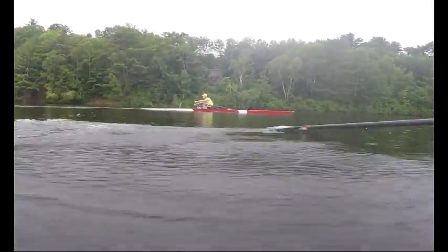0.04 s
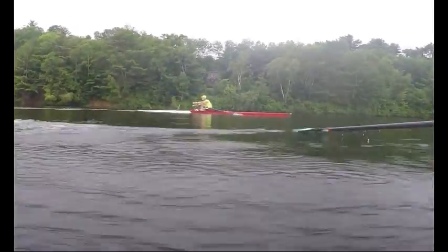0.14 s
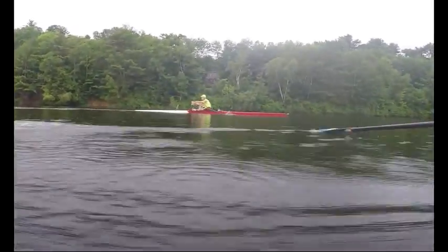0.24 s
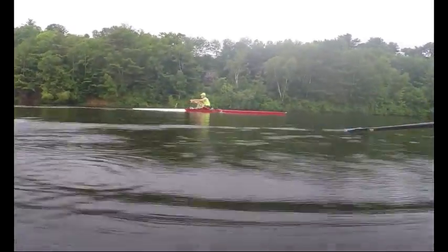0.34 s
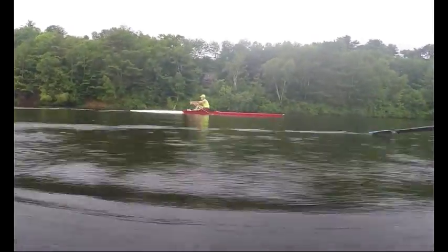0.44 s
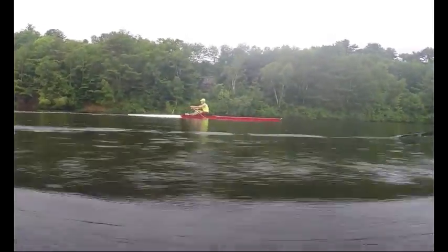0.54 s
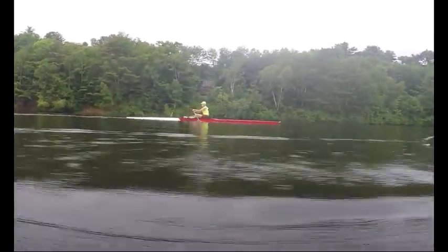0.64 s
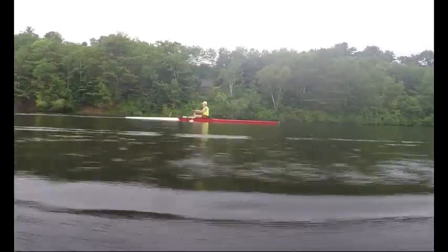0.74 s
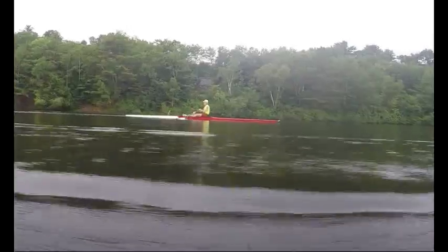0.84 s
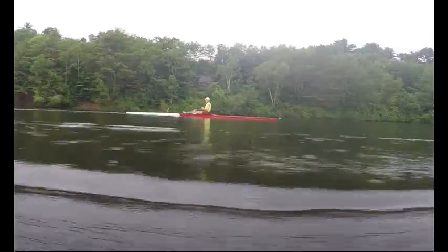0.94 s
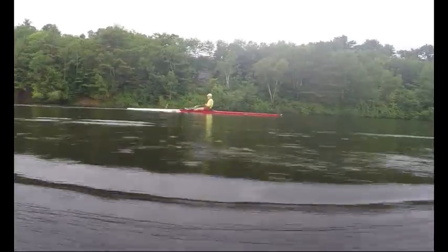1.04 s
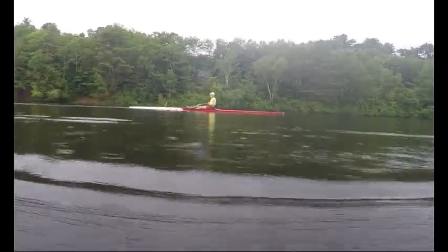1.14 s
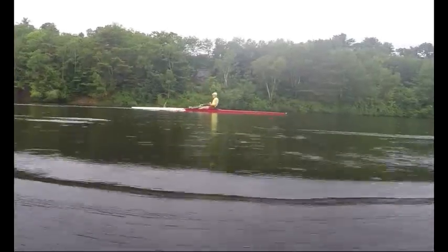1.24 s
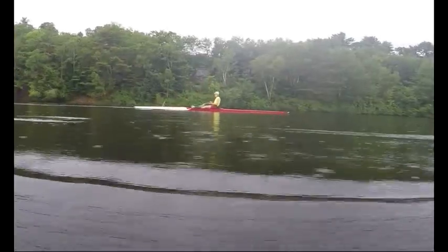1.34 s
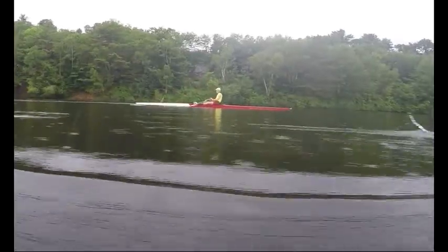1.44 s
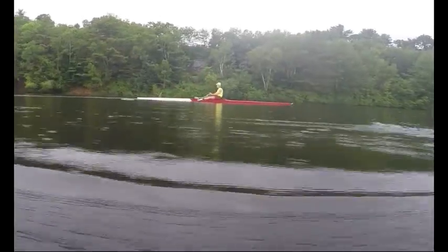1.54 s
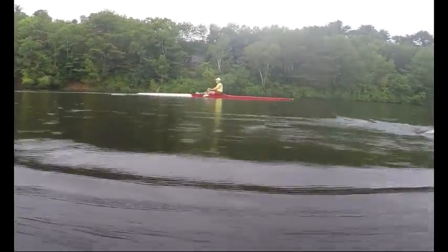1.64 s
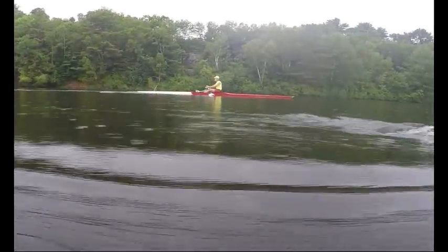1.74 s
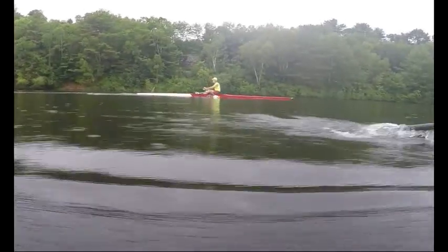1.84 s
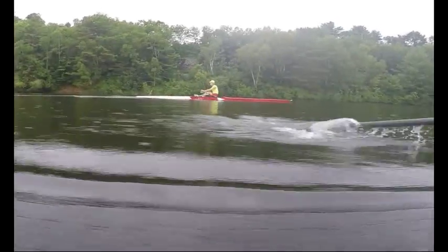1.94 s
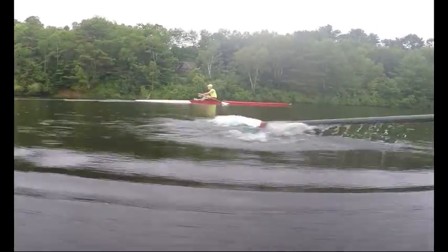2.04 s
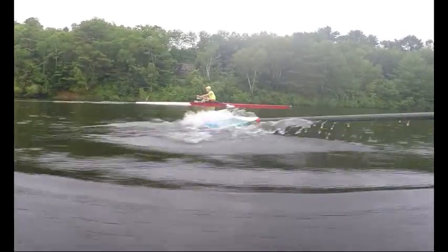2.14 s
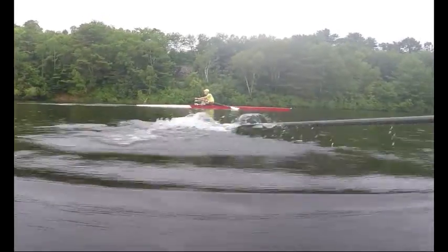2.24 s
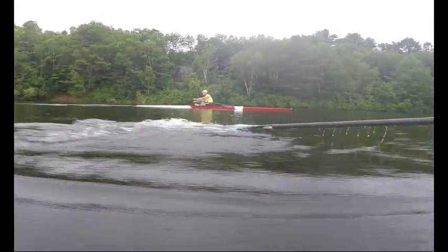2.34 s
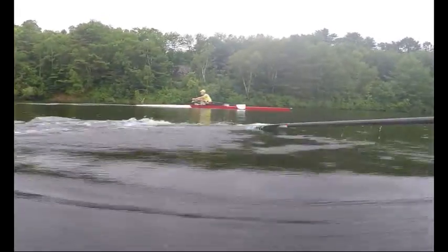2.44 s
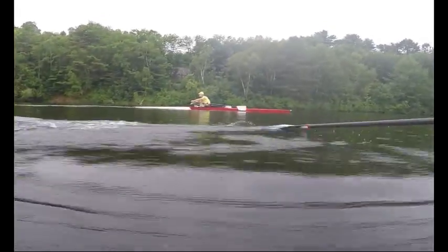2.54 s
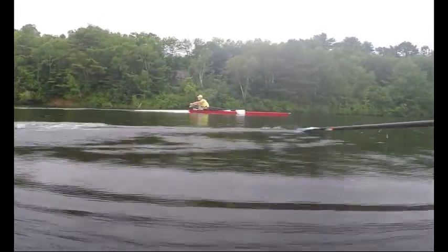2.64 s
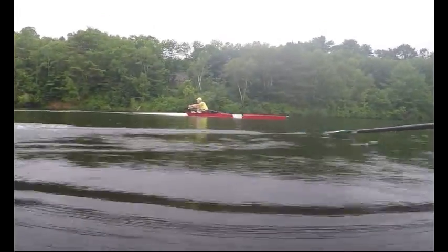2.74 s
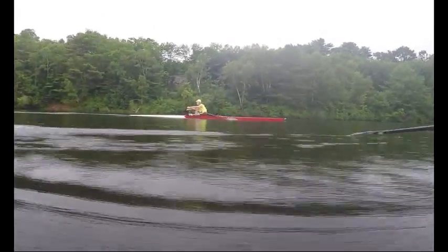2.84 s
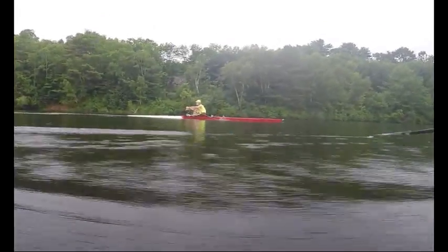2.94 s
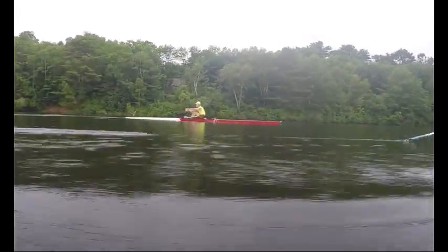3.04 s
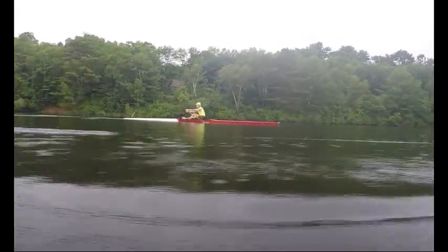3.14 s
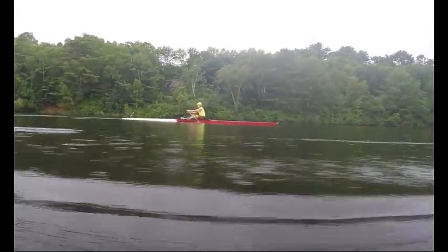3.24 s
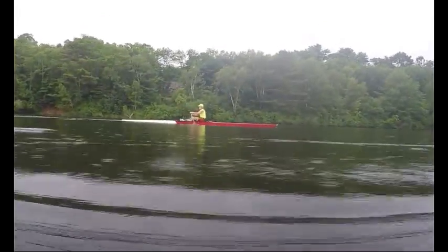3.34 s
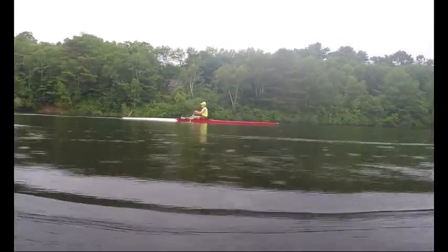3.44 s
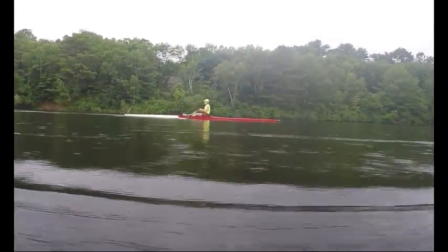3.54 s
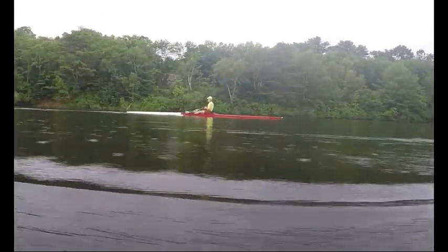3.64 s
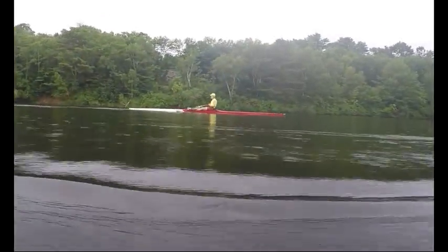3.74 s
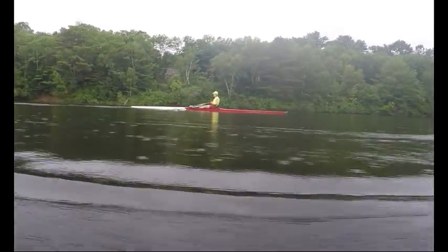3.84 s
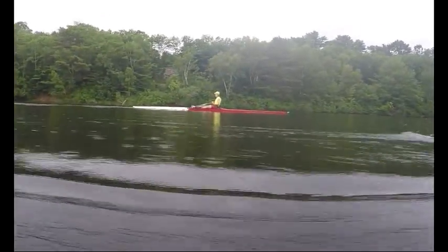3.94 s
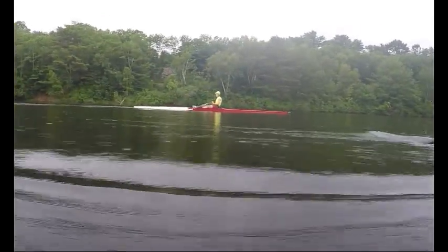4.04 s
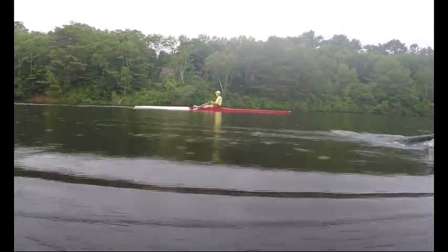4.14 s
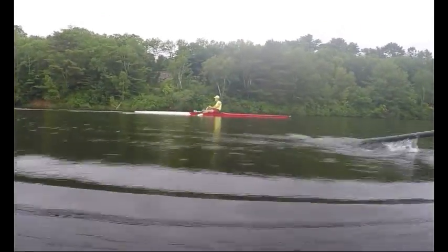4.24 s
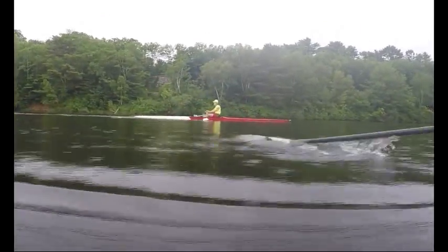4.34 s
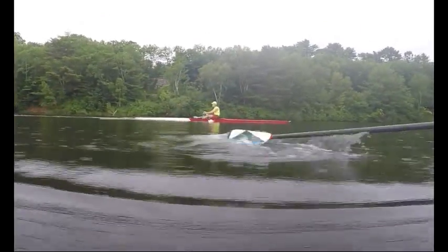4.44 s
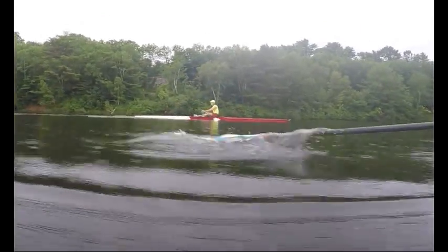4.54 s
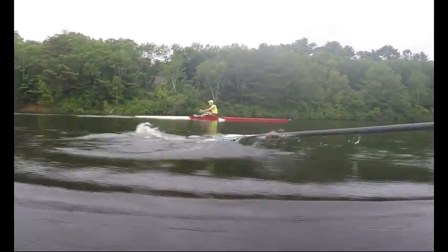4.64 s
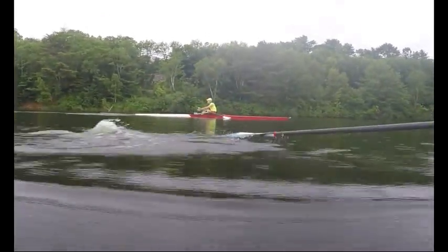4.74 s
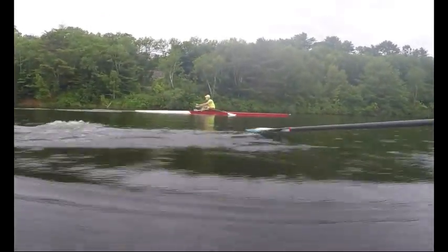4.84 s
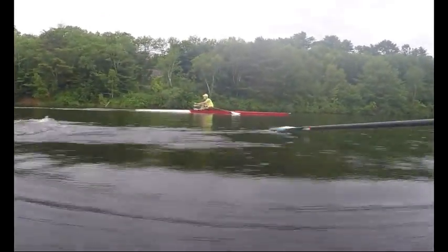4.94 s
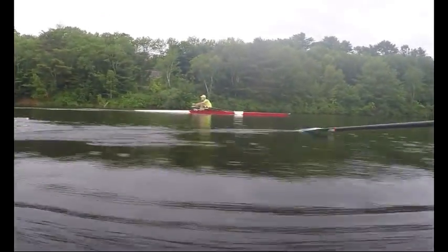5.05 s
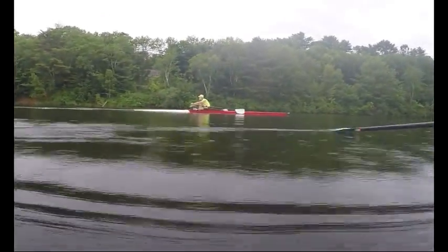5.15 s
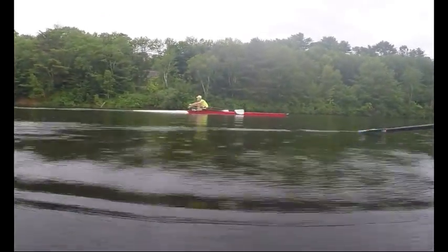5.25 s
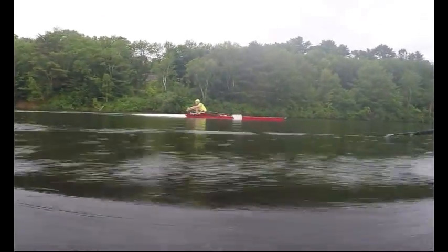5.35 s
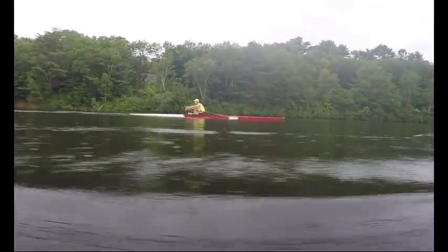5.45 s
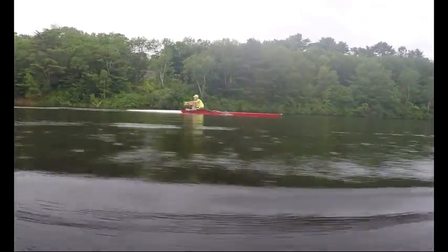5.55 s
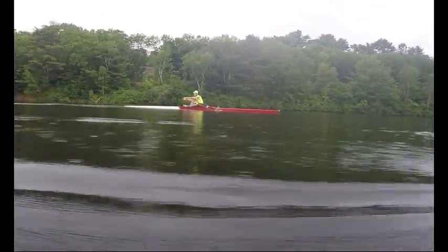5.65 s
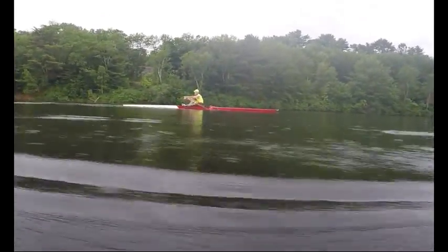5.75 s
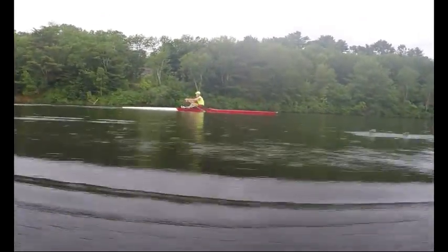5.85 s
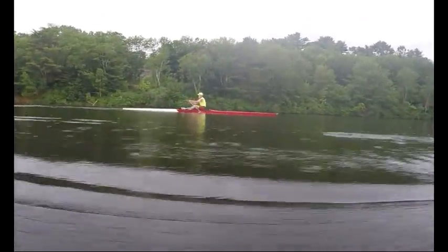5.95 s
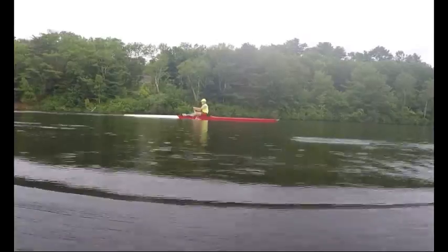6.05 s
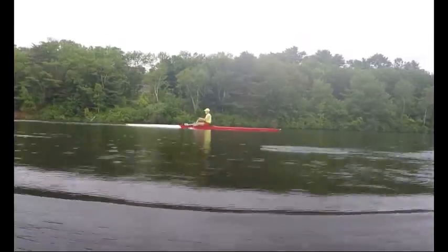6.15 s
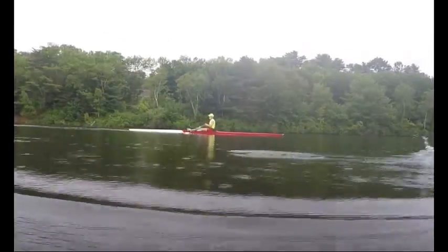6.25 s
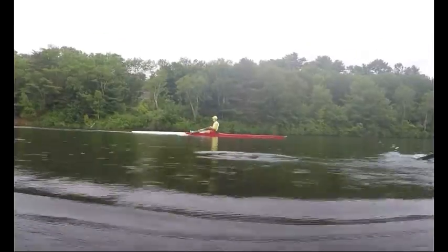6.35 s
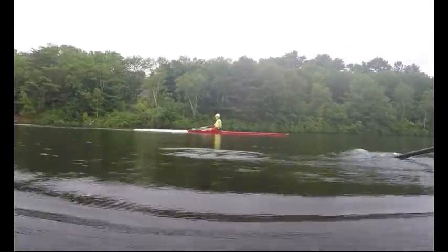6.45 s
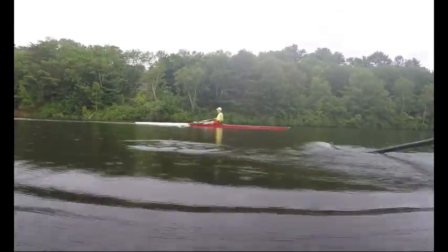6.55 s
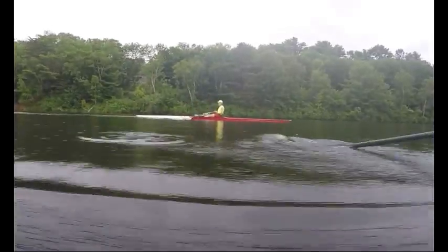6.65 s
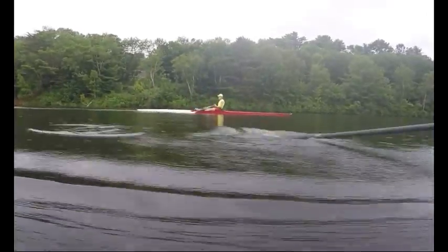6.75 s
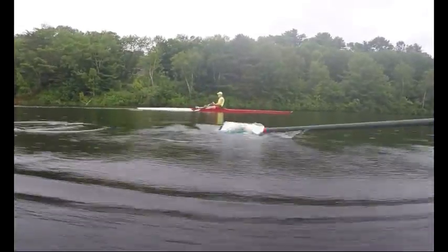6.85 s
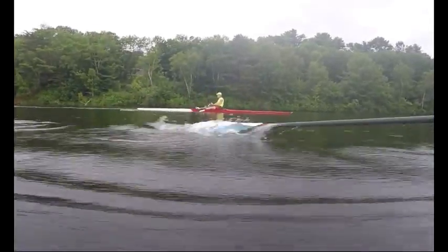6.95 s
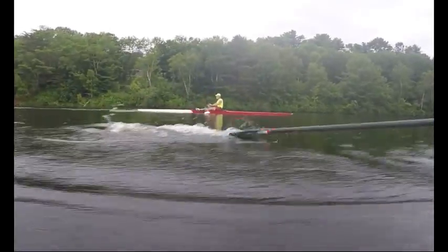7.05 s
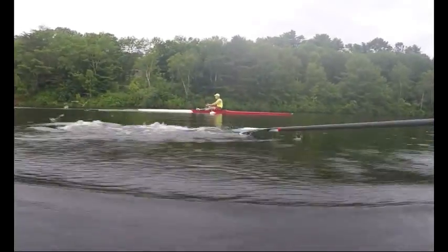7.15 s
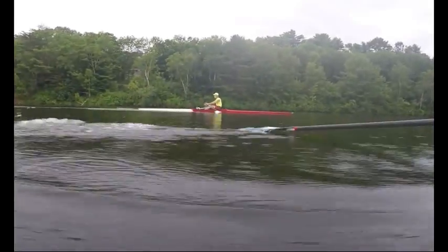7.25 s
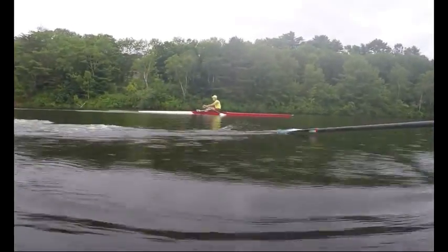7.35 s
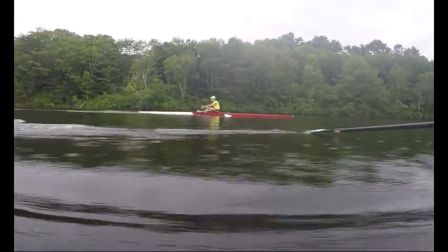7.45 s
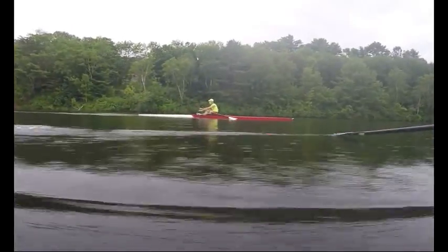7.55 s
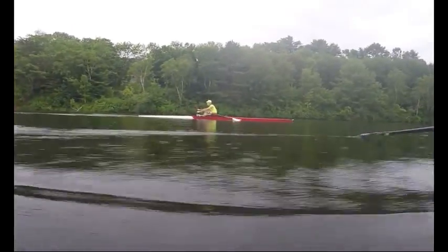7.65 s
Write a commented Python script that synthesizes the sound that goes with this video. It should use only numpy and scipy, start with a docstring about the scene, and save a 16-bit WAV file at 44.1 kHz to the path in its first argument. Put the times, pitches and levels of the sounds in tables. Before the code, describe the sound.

Slow, regular rowing heard from the boat itself: clusters of clunks and low hollow thuds about every one to one and a half seconds, alternating catch and finish. Water swells along the hull before each catch and after each finish, with gurgles and light spray. The seat softly whirrs, droplets tick sharply on the microphone's case, and deep buffeting surges after the knocks. Outdoors, dry and very close.

```python
"""Oars knock hard in their locks at each catch and finish, and the hollow hull booms under them.
Between knocks the seat rolls on its rails, water rushes past, blades splash, drops hit the case, wind shakes it.
Place: a racing rowing boat on a lake. Microphone: one, in a cased camera fixed to the boat, close to it all.
Knocks and drops are struck resonances and short noise bursts; water, wind and seat are coloured noise in swells;
bubbles and short pitched rings are sines that climb in pitch.
"""
import sys
import numpy as np
from scipy import signal
from scipy.fft import rfft, irfft, next_fast_len
from scipy.io import wavfile
from scipy.ndimage import uniform_filter1d, map_coordinates

SR = 44100
rng = np.random.default_rng(int(sys.argv[2]) if len(sys.argv) > 2 else 0)


def store_wav(level_fs):
    """Save 16-bit WAV to argv[1]."""
    pcm = np.round(np.clip(np.atleast_2d(level_fs), -1, 1) * 32767)
    wavfile.write(sys.argv[1], SR, pcm.T.astype(np.int16))


N = 339129  # length in samples


def amp(db):
    """Decibels to gain."""
    return 10 ** (np.asarray(db) / 20)


def unit(x):
    """Scale to rms 1."""
    return x / np.sqrt(np.mean(x ** 2) + 1e-20)


def blow(x, size=1100):
    """Scale a struck sound so that its first size samples have rms 1."""
    return x / np.sqrt(np.mean(x[:size] ** 2) + 1e-20)


def noise():
    """White noise as long as the scene."""
    return rng.standard_normal(N)


def curves(rows):
    """One value per sample for each column after the time."""
    s, *cols = np.transpose(rows)
    return [np.interp(np.arange(N) / SR, s, c) for c in cols]


def wobble(rate):
    """A smooth random curve, rate knots a second."""
    knots = rng.standard_normal(int(N * rate / SR) + 4)
    return map_coordinates(knots, [np.arange(N) * rate / SR])


def sine(pitch_hz):
    """A sine that follows a pitch given for every sample."""
    return np.sin(2 * np.pi * np.cumsum(pitch_hz, axis=-1) / SR)


def filtered(x, response):
    """x times a complex response of frequency."""
    m = next_fast_len(len(x) + SR // 4)
    return irfft(rfft(x, m) * response(np.fft.rfftfreq(m, 1 / SR)), m)[:len(x)]


def coloured(x, points, size=8192):
    """x through a causal minimum-phase filter with the given (Hz, dB) outline."""
    hz, db = np.transpose(points)
    gain = amp(np.interp(np.log(np.fft.rfftfreq(size, 1 / SR) + 1), np.log(hz), db))
    # folding the cepstrum makes the filter respond at once, with no pre-echo
    cepstrum = irfft(np.log(gain))
    cepstrum[1:size // 2] *= 2
    cepstrum[size // 2 + 1:] = 0
    return signal.fftconvolve(x, irfft(np.exp(rfft(cepstrum))))[:len(x)]


def resonate(x, modes):
    """x through a bank of (Hz, width Hz, dB) resonances of alternating sign."""
    def response(f):
        """Sum of the band-pass responses."""
        total = 0
        for k, (centre, width, db) in enumerate(modes):
            band = 1j * f * width / (centre * centre - f * f + 1j * f * width)
            total = total + (-1) ** k * amp(db) * band
        return total

    return filtered(x, response)


def add(track, s, x):
    """Mix x into the track at time s."""
    part = track[max(round(s * SR), 0):][:len(x)]
    part += x[:len(part)]


def patter(rate, spread_db):
    """Random tiny impacts, about rate a second, a few much stronger than the rest."""
    hit = rng.random(N) < rate / SR
    strength = np.minimum(rng.exponential(size=N), 4)
    return unit(hit * rng.choice([-1, 1], N) * amp(spread_db * strength))


def swell(times, db, delay, attack, hold, release):
    """A gain at its top delay s after each time: climbs 20 dB in attack s, holds, falls 20 dB in release s."""
    t = np.arange(N) / SR - (times + delay)[:, None]
    fall = np.maximum(np.maximum(-t / attack, (t - hold) / release), 0)
    return amp(np.max(np.reshape(db, (-1, 1)) - 20 * fall, axis=0))


def together(*gains):
    """Unrelated causes add in power."""
    return np.sqrt(sum(g ** 2 for g in gains))


# the strokes, which also time the hull and the water; levels are relative:
# catch_s, finish_s, glide_db (before the catch), effort_db (of the drive), puddle_db (left by the blades),
# spray_db (thrown), jolt_db (at the finish)
STROKES = [(-1.55, -0.5, 0, 0, 1, 0, -2), (0.83, 1.93, 2, 1, -6, 2, 0.5),
           (3.33, 4.365, -0.5, -2.5, -0.5, 0, 3.5), (5.72, 6.75, 0, 0.5, 1, -2, 2),
           (8.1, 9.15, 0, 0, 0, 0, 0)]
# the breeze on the case: time_s, relative_level_db
BREEZE = [(0.0, -18), (0.3, -25), (0.7, -19.5), (1.3, -15.5), (1.8, -19), (2.6, -20), (2.85, -26.5),
          (3.2, -20.5), (3.8, -22), (4.3, -26), (5.4, -23.5), (6.25, -17.5), (6.5, -22.5), (7.69, -22)]
# colour of the sway: frequency_hz, level_db (per Hz)
SWAY_COLOUR = [(15, -5), (27, -4.5), (36, 3.5), (43, 9.5), (52, 0.5), (75, -5.5), (110, -13), (300, -78.5)]


def wind():
    """The breeze and the jolt of each catch and finish sway the case on its mount: a low buffeting."""
    catch, finish, *_, jolt_db = np.transpose(STROKES)
    breeze_db, = curves(BREEZE)
    catch_jolt = swell(catch, db=-14.8, delay=0.01, attack=0.14, hold=0.2, release=0.3)
    finish_jolt = swell(finish, db=jolt_db - 16.8, delay=0.01, attack=0.04, hold=0.52, release=0.53)
    sway = coloured(noise(), SWAY_COLOUR)
    # the sway keeps a fairly even strength within each gust
    power = np.abs(uniform_filter1d(sway ** 2, size=4400)) + 1e-20
    sway = unit(sway / power ** 0.29)
    return amp(-2.3) * together(amp(breeze_db), catch_jolt, finish_jolt) * sway


# colour of the hull's drumming: frequency_hz, level_db (per Hz)
DRUM_COLOUR = [(60, -26.5), (90, -1.5), (118, -1.5), (138, 3.5), (162, -3.5), (195, 1), (228, -6),
               (255, -6.5), (290, -21), (390, -26), (460, -33.5), (900, -79.5)]


def hull():
    """The hull drums as the rower turns round at the catch, under the drive, and after the finish."""
    catch, finish, _, effort_db, *_ = np.transpose(STROKES)
    turn = swell(catch, db=-19.5, delay=0.06, attack=0.58, hold=0.1, release=0.26)
    drive = swell(catch, db=0.7 * effort_db - 28.5, delay=0.34, attack=0.48, hold=0.12, release=0.6)
    recoil = swell(finish, db=-17.5, delay=0.04, attack=0.04, hold=0.25, release=0.4)
    drum = unit(coloured(patter(rate=500, spread_db=1.0), DRUM_COLOUR))
    return together(amp(-30.3), turn, drive, recoil) * amp(1.4 * wobble(12)) * drum


# each run of the seat, forward before a catch and back during the drive:
# full_speed_s, hold_s, relative_level_db, whirr_hz (of the wheels at full speed)
SLIDES = [(0.58, 0.22, -35, 740), (1.17, 0.29, -35.5, 730), (3.0, 0.22, -34.5, 700),
          (3.65, 0.32, -37.5, 720), (5.46, 0.24, -35.5, 725), (6.04, 0.31, -36.5, 750),
          (7.75, 0.2, -37, 740)]
# colour of the rumble: frequency_hz, level_db (per Hz)
SEAT_COLOUR = [(280, -5.5), (450, -6.5), (580, 1.5), (690, 6.5), (780, 4.5), (880, -9.5), (1100, -12.5),
               (1600, -61.5)]


def seat(whirr_db=-9, width_hz=70, sag_hz=110):
    """The seat wheels rumble along their rails, with a whirr whose pitch climbs as they gather speed."""
    when, hold, db, hz = np.transpose(SLIDES)
    run = swell(when, db=db, delay=0.005, attack=0.55, hold=hold[:, None], release=0.27)
    top_db, top_hz = curves(np.transpose([when, db, hz]))
    pitch = top_hz - sag_hz * (1 - run / amp(top_db))
    turn = 2 * np.pi * np.cumsum(pitch) / SR
    # random strengths on sine and cosine make a narrow band of noise around the pitch
    whirr = unit(wobble(width_hz) * np.sin(turn) + wobble(width_hz) * np.cos(turn))
    rumble = unit(coloured(noise(), SEAT_COLOUR))
    rolling = together(amp(-49), run) * rumble + amp(whirr_db) * run * whirr
    return amp(1.2 * wobble(18) - 0.8) * rolling


def climbing_ring(hz, t60, rise, t):
    """A short decaying sine whose pitch climbs, as an air bubble's does when it nears the surface."""
    pitch = hz * (1 + rise * np.minimum(t / t60, 1))
    return sine(pitch) * amp(-60 * t / t60) * (1 - np.exp(-t / 0.00087))


def babble(count, low_hz, high_hz, t60, spread_db):
    """Many small bubbles of mixed size at random moments, rms 1."""
    when, pitch, life, size = rng.random((count, 4)).T[..., None]
    t = np.arange(SR // 40) / SR
    hz = low_hz * (high_hz / low_hz) ** pitch
    bubbles = amp(spread_db * size ** 2) * climbing_ring(hz, t60 * (.5 + life), 0.039, t)
    place = (when * N).astype(int) + np.arange(len(t))
    return unit(np.bincount(place.ravel(), bubbles.ravel(), N)[:N])


# colour of the droplets, in the spray and on the case: frequency_hz, level_db (per Hz)
DROPLET_COLOUR = [(1500, -6), (2100, 3), (3300, -4), (3900, -1.5), (4200, -4), (4550, 0.5), (5150, -7),
                  (5850, -2.5), (6700, -13), (8000, -19), (9500, -19), (12500, -26)]


def drizzle(rate, life_s=.002):
    """Tiny droplets: soft splats of a few milliseconds, among bubbles too brief to have a clear pitch."""
    decay = np.exp(-np.arange(SR // 50) / SR / life_s)
    power = signal.fftconvolve(patter(rate=rate, spread_db=3.5) ** 2, decay)[:N]
    splats = unit(np.sqrt(np.abs(power)) * noise())
    pings = babble(count=900, low_hz=3300, high_hz=6500, t60=.005, spread_db=13)
    return unit(coloured(splats + 0.4 * pings, DROPLET_COLOUR))


# colour of the water along the hull: frequency_hz, level_db (per Hz)
WASH_COLOUR = [(500, -1.5), (950, 1), (1150, -3.5), (1420, 0), (1800, -4.5), (2100, -0.5), (2300, -4.5),
               (2520, 0.5), (2720, -13), (2900, -6.5), (3200, -43.5), (5000, -35.5), (8000, -54),
               (12000, -68.5)]
# colour of the spray off the blades: frequency_hz, level_db (per Hz)
SPRAY_COLOUR = [(1500, -13.5), (3000, 5), (3400, 0.5), (3900, 1), (4500, 1.5), (5150, -5), (5800, -3),
                (6700, -11.5), (7400, -11), (7900, -12.5), (8800, -19.5), (12500, -21.5)]


def water():
    """Ripples bubble along the hull in glide and drive; the blades throw a fizzing spray as they leave."""
    catch, finish, glide_db, effort_db, puddle_db, spray_db, _ = np.transpose(STROKES)
    glide = swell(catch, db=glide_db - 42.2, delay=-0.28, attack=1.18, hold=0.25, release=0.34)
    drive = swell(catch, db=effort_db - 47.2, delay=0.32, attack=0.2, hold=0.3, release=0.5)
    puddle = swell(finish, db=puddle_db - 42.8, delay=0.05, attack=0.08, hold=0.24, release=0.9)
    thrown = swell(finish, db=spray_db - 55, delay=0.2, attack=0.55, hold=0.15, release=0.55)
    flow = together(amp(-50), glide, drive, puddle)

    bubbles = babble(count=4500, low_hz=958, high_hz=2702, t60=0.017, spread_db=6)
    trickle = unit(amp(4 * wobble(22)) * patter(rate=450, spread_db=3))
    wash = unit(coloured(noise() + .55 * trickle + .3 * bubbles, WASH_COLOUR))
    # longer-ringing bubbles come in uneven bunches
    lingering = babble(count=700, low_hz=900, high_hz=2500, t60=0.025, spread_db=9)
    bunches = unit(coloured(amp(4 * wobble(14)) * lingering, WASH_COLOUR))
    hull_wash = flow * (amp(1.3 * wobble(19) - 0.7) * wash + amp(-9) * bunches)

    spray = unit(coloured(noise() + .45 * patter(rate=900, spread_db=3), SPRAY_COLOUR))
    spray_gain = together(amp(-65.5), amp(-22) * flow, amp(-1.3) * thrown)
    blade_spray = spray_gain * amp(1.5 * wobble(30)) * spray
    # tiny droplets tick all through the stroke and swell with the flow and the thrown spray
    droplet_gain = together(amp(-65.5), amp(-22.5) * flow, amp(-5) * thrown)
    return hull_wash + blade_spray + droplet_gain * drizzle(rate=120)


# colour of the electronics' hiss: frequency_hz, level_db (per Hz)
HISS_COLOUR = [(2000, 4), (6000, -16), (8500, -4), (12500, -6)]


def camera(hiss_db=-72, whine_hz=6315, whine_db=-75):
    """The electronics hiss and whine very faintly; the whine's phase wanders."""
    whine = np.sin(2 * np.pi * whine_hz * np.arange(N) / SR + 1.4 * wobble(34))
    return amp(hiss_db) * unit(coloured(noise(), HISS_COLOUR)) + amp(whine_db) * whine


def chatter(t, t60, first, rise):
    """The parts seat against each other over a few milliseconds, then rattle ever more faintly."""
    hits = rng.standard_normal(len(t)) * (rng.random(len(t)) < 2500 / SR)
    rattle = hits * amp(-60 * t / t60) * (1 - np.exp(-t / rise))
    force = rattle / np.linalg.norm(rattle)
    force[round(rise * SR)] += first
    return force


# hull modes: nominal_hz, relative_level_db, t60_s
HULL_MODES = [(110.8, -11, 0.9), (138.4, -3, 0.78), (169.5, -5, 0.39), (196, 1, 0.68), (219.2, -5, 0.44),
              (248.5, -3, 0.2), (288.5, -10, .14), (389.6, -12.5, 0.16)]


def hull_boom(t, tilt_db):
    """The hull modes ring at new strengths for every blow and take a few milliseconds to build."""
    boom = np.zeros(len(t))
    for hz, level_db, t60 in HULL_MODES:
        mode_hz = hz * (1 + rng.normal(0, 0.011))
        swing = rng.choice([-1, 1]) * np.sin(2 * np.pi * mode_hz * t)
        tilt = tilt_db * np.log2(hz / HULL_MODES[0][0])
        boom += amp(level_db + tilt + rng.normal(0, 2.5) - 60 * t / t60) * swing
    return boom * (1 - np.exp(-t / 0.0036))


# oar against oarlock, seat against its stop, bunched at each catch and finish; levels are relative:
# start_s, clunk_db, thud_over_clunk_db (hull), clack_over_clunk_db, thud_tilt_db (per octave)
KNOCKS = [(0.177, -35.5, 1, -5, 0), (0.812, -29, 20, -10, -5), (0.835, -26.5, 11, -13, -5),
          (0.886, -25.5, 10, -0.5, -2), (0.916, -22, 13, -5.5, 0), (1.141, -31, -5, -18, 0),
          (1.33, -42, 26, -8, -9), (1.751, -34, 9, 0, 3), (1.79, -33.5, 3, -4, 3), (1.917, -33, 0, -8, 0),
          (1.927, -20.5, 12, -16, 2), (1.942, -23, 18, -6, 3), (1.963, -24, 19.5, -1, 4.5),
          (2.03, -32, 14, -2, 3), (2.088, -26, 6, -2, 0), (2.107, -22, 6, -7.5, 0), (2.2, -43, 25, -4, 3),
          (2.616, -31.5, 4, -6, 0), (3.012, -33.5, 8, 3, 0), (3.225, -33, 8, -9, 0), (3.313, -30, 5, -2, 0),
          (3.345, -25.5, 13, -8, 0), (3.43, -44, 27, -8, -6), (4.022, -44, 23, -6, 8),
          (4.17, -39, 3, -9, 0), (4.339, -32, 0, -6, 0), (4.369, -20.5, 17, -10, 2),
          (4.413, -24.5, 13, -4, -3), (4.487, -24, 18, -14, -10), (4.537, -26, 2, -9, 0),
          (4.557, -31, 2, -2, 0), (4.578, -22, 12, -10, 2), (4.94, -44, 22, -8, -5),
          (4.997, -31, -6, -5, 0), (5.694, -29, 15, -1, 3), (5.714, -26, 13.5, -16, 5),
          (5.76, -21.5, 14, -6, 2), (6.268, -24.5, -2, -10, 0), (6.455, -36, 5, -12, 0),
          (6.743, -18.5, 0, -14, 0), (6.767, -13, 8, -10, 2), (6.788, -19.5, 10, -17, 0),
          (6.872, -19, 10, -12, -1), (6.881, -24, 13, -1, 0), (7.032, -27.5, 10, -11, -2),
          (7.21, -44, 22, -3, 0), (7.393, -33, 0, -1, 0)]
# rigger and case resonances: frequency_hz, width_hz, level_db
CLUNK_MODES = [(292, 25, -2.5), (371, 39, -1.5), (543, 75, 2), (647, 99, 1.5), (772, 71, 2),
               (1015, 50, -6.5)]
# colour of the clack: frequency_hz, level_db (per Hz)
CLACK_COLOUR = [(800, -20), (1130, -6), (1290, 7), (1360, 4.5), (1430, 10), (1505, 3), (1576, 7),
                (1700, -8), (1816, -3), (1900, -9), (2020, 2), (2250, -10), (2470, -2), (2720, -19),
                (2870, -12), (3400, -25), (4400, -26), (5300, -35.5), (8000, -40), (12500, -55.5)]


def oarlocks():
    """Each knock chatters briefly in the lock, rings the rigger and sets the hull booming."""
    track, t = np.zeros(N), np.arange(SR * 6 // 10) / SR
    for s, db, thud_db, clack_db, tilt_db in KNOCKS:
        rung = resonate(chatter(t, t60=0.195, first=0.75, rise=0.0018), CLUNK_MODES)
        clunk = coloured(rung, [(1000, -4), (2000, -5), (5000, -27.5), (12000, -38.5)])
        clack = coloured(chatter(t, t60=0.125, first=0.42, rise=0.0024), CLACK_COLOUR)
        add(track, s, amp(db + thud_db - 8) * blow(hull_boom(t, tilt_db)))
        add(track, s, amp(db - 2.5) * blow(clunk) + amp(db + clack_db - 3.5) * blow(clack))
    return track


def splat(t, t60, attack, colour):
    """A drop landing: a burst of coloured noise of peak 1."""
    burst = rng.standard_normal(len(t)) * amp(-60 * t / t60) * (1 - np.exp(-t / attack))
    x = coloured(burst, colour)
    return x / np.abs(x).max()


# the loudest spray landing on the case: start_s, tick_db, wet_splat_db
TICKS = [(0.219, -41, -48), (0.2992, -43, -42), (0.4539, -39, -29), (0.5028, -34, -29), (0.5457, -38, -33),
         (0.8909, -39, -36), (1.0061, -46, -33), (1.1323, -38, -46), (1.2795, -40, -42), (1.3179, -38, -38),
         (1.481, -41, -43), (1.9195, -32, -45), (1.9914, -32, -34), (2.363, -37, -46), (3.022, -39, -38),
         (3.5957, -39, -46), (3.6785, -42, -42), (4.416, -35, -38), (4.5481, -31, -42), (5.03, -41, -34),
         (6.0157, -33, -42), (6.1315, -42, -44), (6.2846, -41, -33), (6.4368, -40, -31), (6.5151, -42, -38),
         (7.2125, -36, -35)]
# drops that hit the case and trap a bubble: start_s, splat_db, bubble_db, bubble_hz (once closed)
DROPS = [(1.415, -17, -11.5, 4460), (1.4153, -30, -19, 3150), (1.704, -34, -23, 1670),
         (2.8005, -24.5, -15, 2010), (2.801, -28, -21, 2750), (5.902, -30, -23, 1980),
         (5.9015, -33, -31, 3800)]
# colour of a wet splat: frequency_hz, level_db (per Hz)
SPLAT_COLOUR = [(500, -22), (1050, -5), (1450, 0), (1750, -4), (2100, 2), (2500, -1), (3200, -14),
                (8000, -35)]
# colour of a big drop's impact: frequency_hz, level_db (per Hz)
IMPACT_COLOUR = [(1000, -25), (2000, -3), (3000, 3), (3800, 3), (4500, 0), (5100, -4), (5900, -7),
                 (7000, -14), (9000, -18), (12500, -17)]


def drops():
    """Drops tick and splat on the case; the big ones trap a short-lived bubble."""
    track, t = np.zeros(N), np.arange(SR // 20) / SR
    for s, tick_db, splat_db in TICKS:
        tick = splat(t, t60=0.032, attack=0.0007, colour=DROPLET_COLOUR)
        wet = splat(t, t60=0.045, attack=0.0012, colour=SPLAT_COLOUR)
        add(track, s, amp(tick_db) * tick + amp(splat_db) * wet)
    for s, splat_db, bubble_db, hz in DROPS:
        # the pitch scoops up as the bubble closes
        pitch = hz * (1 - 0.22 * np.exp(-t / 0.0007))
        bubble = sine(pitch) * amp(-60 * t / 0.014) * (1 - np.exp(-t / 0.0009))
        impact = splat(t, t60=0.0045, attack=0.0001, colour=IMPACT_COLOUR)
        add(track, s, amp(bubble_db) * bubble + amp(splat_db) * impact)
    return track


# the loudest pockets of air gurgling beside the hull: start_s, level_db, typical_bubble_hz, length_s
GURGLES = [(.44, -39, 1900, .03), (0.568, -38, 1800, .045), (.68, -39, 2060, .02), (1.005, -40, 2220, .012),
           (2.598, -39, 2050, .02), (2.745, -40, 1340, .03), (3.06, -41, 2050, .025),
           (3.234, -39, 2090, .04), (3.411, -42, 1210, .025), (4.875, -40, 1250, .04),
           (5.008, -40, 1740, .03), (5.991, -36.5, 1350, .035), (7.111, -43, 1600, .02),
           (7.412, -39, 1080, .035), (7.435, -41, 2250, .03), (7.487, -36.5, 1700, .018)]


def gurgles(count=20):
    """Each pocket of air breaks into a quick cluster of bubbles of like size."""
    track, t = np.zeros(N), np.arange(SR // 8) / SR
    for s, db, hz, length in GURGLES:
        cluster = np.zeros(len(t))
        # age runs from 0 to 1 through the cluster, unevenly
        for age in np.linspace(0, 1, count) * rng.uniform(.7, 1, count):
            bubble = climbing_ring(hz * np.exp(rng.uniform(-.16, .12)), .022, .04, t)
            add(cluster, age * length, amp(rng.normal(0, 3) - 5 * age) * bubble)
        add(track, s, amp(db) * blow(cluster))
    return track


# short pitched rings of the rigger and case, alone or among the knocks:
# start_s, level_db, starting_pitch_hz
RINGS = [(0.686, -29, 1970), (0.778, -32, 1380), (0.917, -22, 1330), (3.226, -33, 1380),
         (3.313, -17.5, 1460), (4.364, -12.5, 1620), (4.665, -31, 2050), (5.672, -33, 1380),
         (5.884, -32, 870), (6.44, -33, 1040), (6.743, -18, 2420), (6.881, -17, 1470), (7.114, -32, 1520),
         (7.396, -31, 1450)]


def rings(t60_s=.05, rise=.04):
    """Short pitched rings, alone or with a knock; each has a clear pitch that climbs by the fraction rise."""
    track, t = np.zeros(N), np.arange(SR // 10) / SR
    for s, db, hz in RINGS:
        onset = 1 - np.exp(-t / 0.0016)
        add(track, s, amp(db) * climbing_ring(hz, t60_s, rise, t) * onset)
    return track


def whistle(start=3.26, length=0.15, low_hz=4480, high_hz=4900, db=-60):
    """One faint, thin, wavering whistle that rises in pitch."""
    track, u = np.zeros(N), np.linspace(0, 1, round(length * SR))
    pitch = low_hz + (high_hz - low_hz) * u ** 1.3 + 35 * wobble(200)[:len(u)]
    add(track, start, amp(db) * np.sin(np.pi * u) * sine(pitch))
    return track


# the oar collar twists in its lock with a bright scrape: start_s, level_db, length_s
SCRAPES = [(4.342, -35, .018), (4.363, -25.5, 0.013), (6.729, -32.5, 0.016), (6.737, -24.5, 0.019),
           (6.755, -21, 0.012)]
# colour of the scrape: frequency_hz, level_db (per Hz)
SCRAPE_COLOUR = [(600, -18.5), (1200, 2), (1600, 7.5), (2050, -7), (2470, 8.5), (2800, -12), (3400, -18),
                 (4850, -16), (5400, -26), (6000, -20.5), (7000, -37), (8000, -31.5), (9200, -42.5),
                 (12500, -48)]


def collar():
    """A few milliseconds of friction swell and stop as the blade is turned."""
    track, t = np.zeros(N), np.arange(SR // 10) / SR
    for s, db, length in SCRAPES:
        rub = np.sin(np.pi * np.minimum(t / length, 1)) * rng.standard_normal(len(t))
        add(track, s, amp(db) * blow(coloured(rub, SCRAPE_COLOUR), size=500))
    return track


def scene():
    """Everything reaches the one microphone through the case."""
    steady = wind() + hull() + seat() + water() + camera()
    events = oarlocks() + drops() + gurgles() + rings() + whistle() + collar()
    return (steady + events)[None]


def record(dry, top_hz=12550):
    """The camera rounds off the highest peaks and keeps nothing above its band limit."""
    held = dry[0] / (1 + np.abs(dry[0]) ** 8) ** (1 / 8)
    return filtered(held, lambda hz: hz < top_hz)[None]


dry = scene()
out = record(dry)
store_wav(out)
```